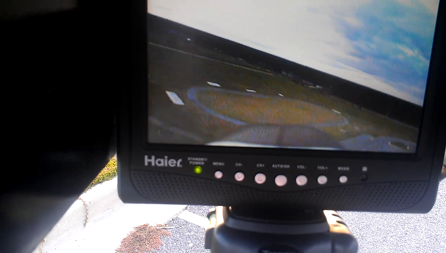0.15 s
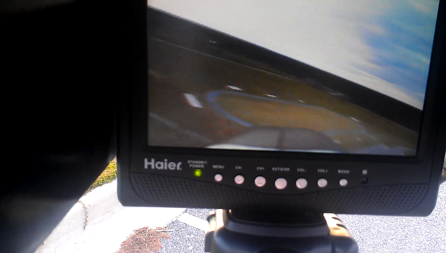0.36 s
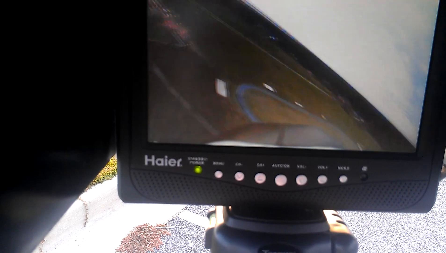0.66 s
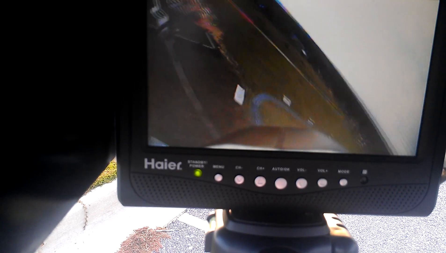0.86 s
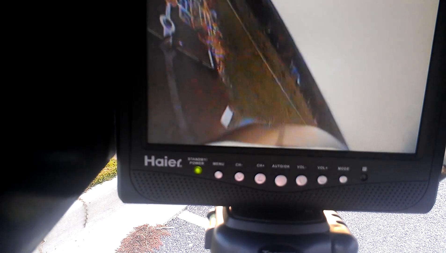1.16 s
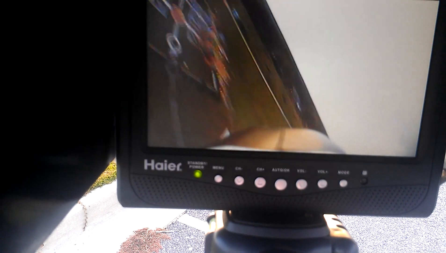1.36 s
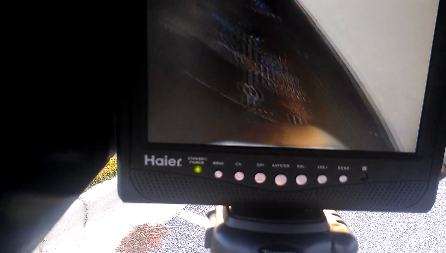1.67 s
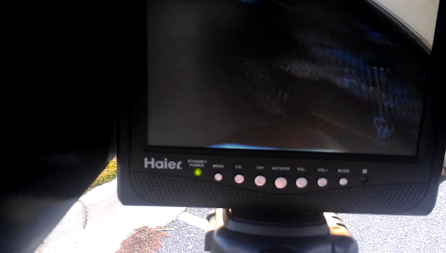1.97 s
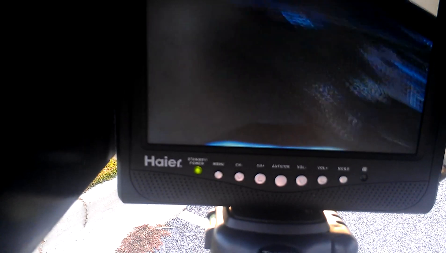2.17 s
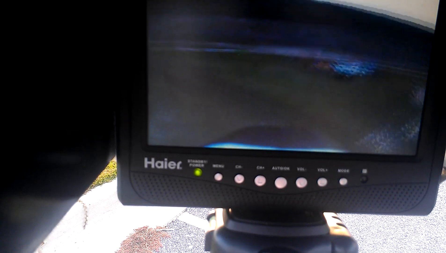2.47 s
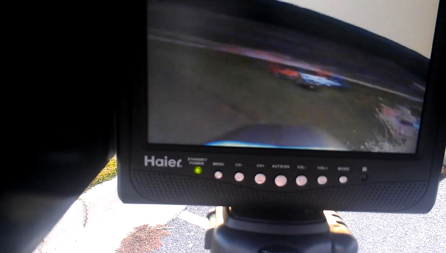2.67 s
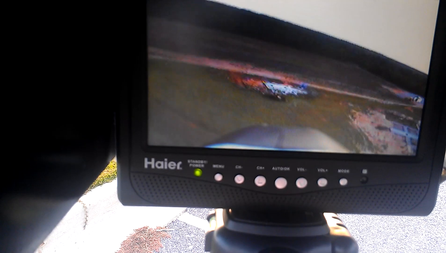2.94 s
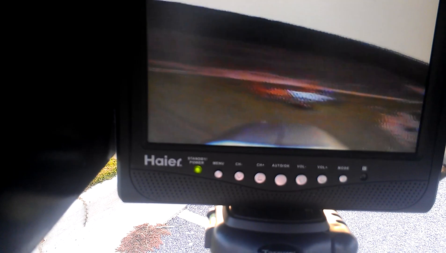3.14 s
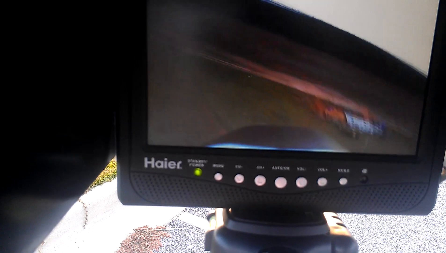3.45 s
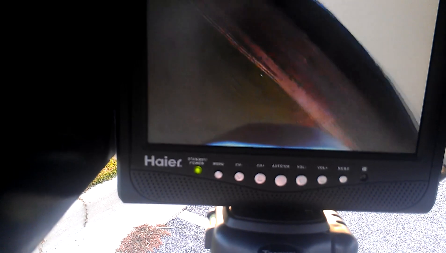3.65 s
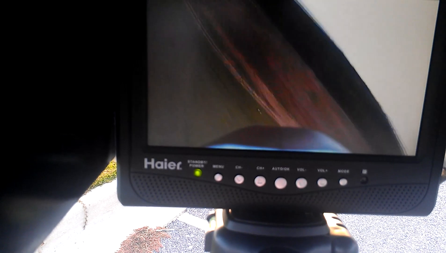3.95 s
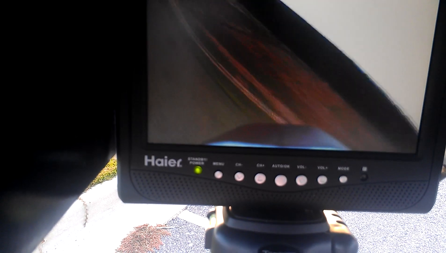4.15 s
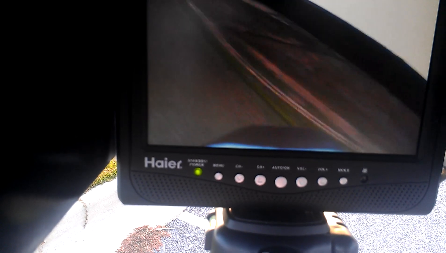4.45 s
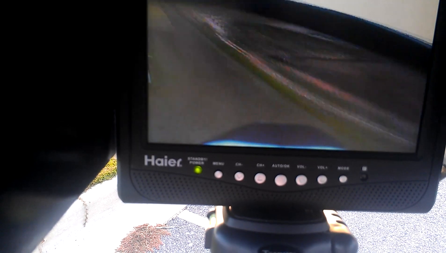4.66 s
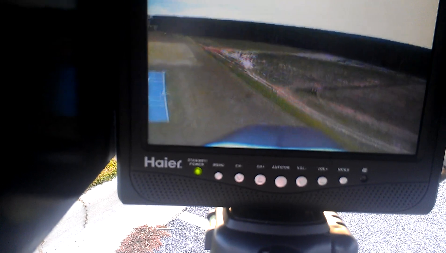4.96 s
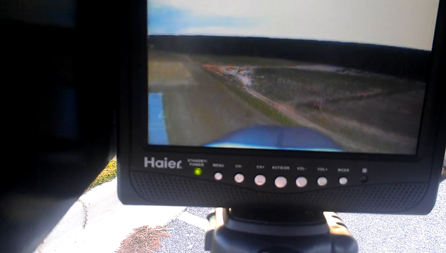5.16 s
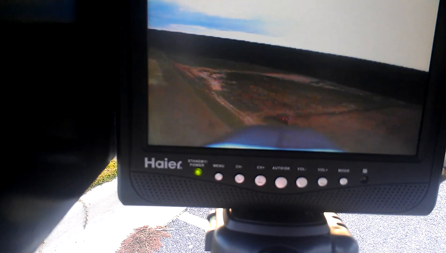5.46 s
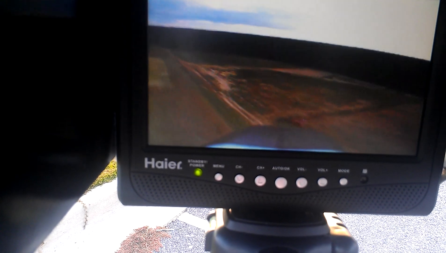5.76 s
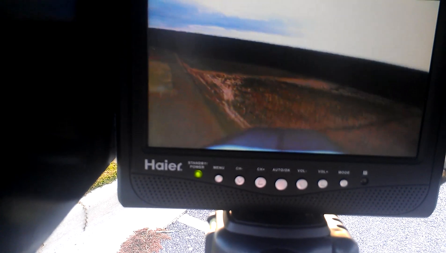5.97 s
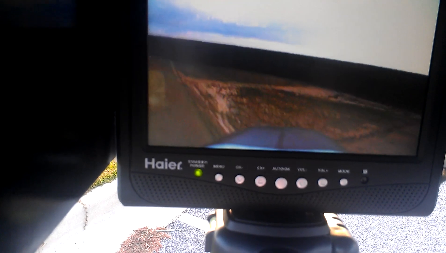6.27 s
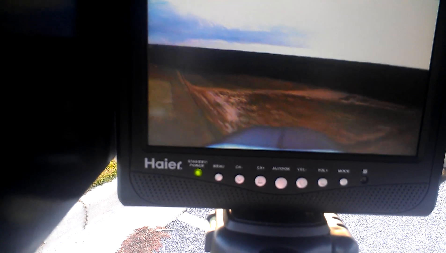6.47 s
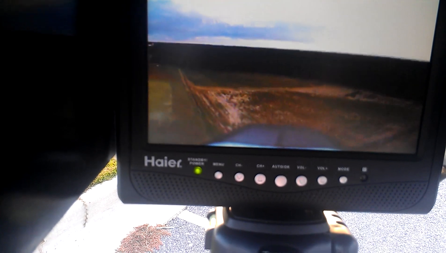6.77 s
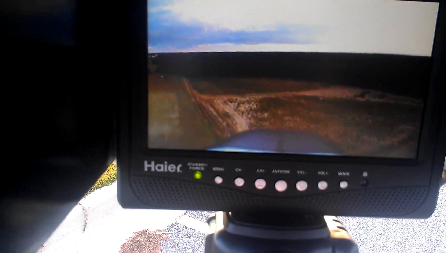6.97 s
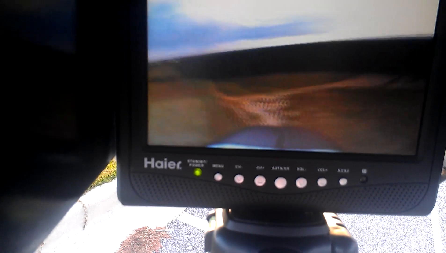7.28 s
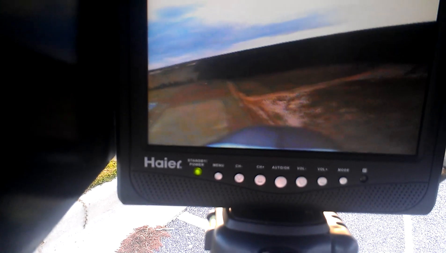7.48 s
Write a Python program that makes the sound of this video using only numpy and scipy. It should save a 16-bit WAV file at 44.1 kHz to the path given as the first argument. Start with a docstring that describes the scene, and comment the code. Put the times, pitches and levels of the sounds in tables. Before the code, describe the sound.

A thin, hissing propeller buzz drops away into broken wind gusts, a click and two small bumps, then climbs back to full power.

```python
"""A small electric model plane is heard through its own on-board microphone, by radio and a field monitor's
little speaker: propeller hiss, shaft-order tones, controller whine and wind, shaped by filters and gain curves.
The throttle closes, the propeller runs down, then spools up again; gusts overload the microphone and choke
the sound in short gaps. One short ringing burst comes from the plane at 1.33 s, and two bumps near the listener
later, all as decaying modes. Also heard are a close rustle of filtered noise, open-air noise, a faint sine hum
and the distant plane's delayed, Doppler-raised blade tone."""
import sys
import numpy as np
from scipy import signal
from scipy.fft import rfft, irfft, next_fast_len
from scipy.io import wavfile
from scipy.ndimage import map_coordinates

SR = 44100
rng = np.random.default_rng(int(sys.argv[2]) if len(sys.argv) > 2 else 0)


def transcribe(u):
    """Save the signal u as a 16-bit wav file named by the first command-line argument.

    u: samples, shape (n,) or (channels, n), limited to [-1, 1]; the rate is SR.
    q: integer samples, one column per channel.
    """
    v = np.clip(np.atleast_2d(u).T, -1, 1)
    q = np.round(v * 32767).astype(np.int16)
    wavfile.write(sys.argv[1], SR, q)


def nominal_scale(level):
    """Amplitude ratio for a level in decibels (scalar or array-like)."""
    x = np.asarray(level, float) / 20
    return 10 ** x


N = 336042
T = np.arange(N) / SR  # time of each sample, s

# mean rotation of the propeller shaft: time_s, shaft_turns_per_s
SHAFT_SPEED = [(0, 257.6), (.95, 257.5), (1.03, 223), (1.11, 187), (1.17, 163), (1.3, 128), (2.27, 110),
               (2.51, 143), (2.62, 163.3), (2.8, 172.3), (2.97, 179.5), (3.21, 205.7), (3.33, 212.1),
               (3.49, 218.5), (3.71, 221), (3.8, 237.2), (3.88, 257.7), (5.7, 257.7), (7.62, 257.2)]
# on-board sound before the speaker: time_s, relative_level_db, wind_over_hiss_db
FLIGHT_LEVELS = [(0, -16.5, -4), (.5, -17.5, -3), (.93, -18.5, -11.5), (1.1, -21.5, 4), (1.2, -26.5, 15.5),
                 (1.34, -27.5, 9), (1.56, -34.5, 21.5), (2.05, -32, 32), (2.24, -33.5, 19),
                 (2.3, -29.5, 10.5), (2.64, -23.5, 6.5), (2.85, -29, 6.5), (3.27, -20, 2), (3.73, -18, 0.5),
                 (3.89, -15, -6.5), (4.04, -21, -10), (4.33, -14.5, 3), (4.55, -17, 5.5),
                 (4.63, -12.5, -1.5), (4.82, -17, 1), (5.5, -16.5, 4.5), (5.9, -16, 1.5), (6.25, -17.5, 3),
                 (6.69, -16, -3), (7.15, -18.5, 4.5), (7.62, -15.5, -1)]
# gust overloads: centre_s, length_s, depth_db
GUST_CHOKES = [(.077, 0.034, 5), (.148, 0.023, 2.5), (.486, 0.014, 16), (.502, 0.0027, 26),
               (.534, .004, 15), (.608, 0.011, 12), (.86, 0.048, 5.5), (1.045, 0.024, 8),
               (1.146, 0.0057, 14), (1.285, 0.071, 10), (1.32, 0.019, 29), (1.376, 0.01, 28),
               (1.392, 0.014, 25), (1.41, 0.014, 27), (1.441, 0.047, 8), (1.475, 0.028, 15),
               (1.516, .018, 18), (1.551, 0.019, 24), (1.578, 0.025, 35), (1.631, 0.038, 15),
               (1.68, 0.037, 7), (1.711, 0.012, 28), (1.727, 0.0082, 20), (1.785, 0.018, 40),
               (1.804, 0.0096, 22), (1.912, 0.012, 15), (2.033, 0.0091, 10), (2.22, .05, 13),
               (2.254, 0.016, 23), (2.279, 0.0063, 13), (2.362, 0.031, 16), (2.442, 0.0091, 22),
               (2.485, 0.035, 30), (2.599, 0.045, 21), (2.898, 0.0061, 10), (2.918, 0.0092, 17),
               (2.943, 0.028, 17), (2.968, 0.0094, 22), (2.985, .004, 22), (3.003, 0.0093, 13),
               (3.57, 0.0087, 10), (3.587, 0.014, 18), (3.603, 0.0014, 25), (3.629, 0.0074, 17),
               (3.706, 0.024, 5.5), (4.149, 0.0083, 15), (4.27, 0.013, 17), (4.379, 0.046, 7),
               (4.412, 0.027, 12.5), (4.464, 0.064, 5.5), (4.567, 0.032, 10), (4.7, 0.13, 4.5),
               (5.458, 0.047, 5.5), (5.543, 0.0049, 31), (5.615, 0.022, 6), (5.685, 0.013, 13),
               (5.707, .007, 35), (5.723, 0.014, 28), (5.76, 0.0074, 19), (5.92, 0.03, 3.5),
               (6.153, 0.025, 6), (6.265, 0.018, 7), (6.328, 0.011, 12.5), (6.531, 0.061, 3.5),
               (6.631, 0.024, 10.5), (6.716, 0.052, 6), (6.862, 0.024, 5.5), (6.917, 0.015, 27),
               (6.934, 0.0078, 26), (6.975, 0.021, 12), (7.08, 0.029, 17), (7.102, 0.0063, 37),
               (7.161, .007, 15), (7.25, 0.0079, 15), (7.35, 0.045, 5.5), (7.378, 0.012, 19),
               (7.42, 0.055, 24.5), (7.46, 0.03, 10.5), (7.487, 0.0053, 25), (7.517, .005, 20)]
# shaft orders, even ones from the two blades, 42 from the commutation; levels before the common tone gain:
# multiple, full_speed_db, part_speed_db
SHAFT_ORDERS = [(2, -14, -11), (3, -18, -35), (4, -20.5, -8.5), (5, -19.5, -26), (6, -11, -9.5),
                (8, -8.5, -9.5), (10, -17.5, -14), (12, -16, -15), (14, -23.5, -30), (16, -19.5, -35),
                (18, -20, -39), (20, -21, -34), (22, -15, -18), (42, -16, -6)]
# wind on the on-board microphone, duller than the propeller hiss: frequency_hz, gain_db
WIND_SPECTRUM = [(200, 1.5), (550, 3), (850, 7.5), (1100, -2.5), (1500, -2), (2000, -7), (3000, -19),
                 (5000, -17.5), (8000, -47)]
# small speaker in its plastic case, from cone resonance to break-up; all three: frequency_hz, gain_db
CONE_RESPONSE = [(151, -69.5), (237, -61), (409, -39), (484, -29.5), (530, -23.5), (668, -22.5), (760, -17),
                 (800, -21.5), (851, -15), (1184, -19), (1540, -11.5), (1701, -13.5), (1900, -0.5),
                 (2090, -2.5)]
CASE_RESPONSE = [(2196, -15.5), (2455, -17.5), (2606, -10), (2900, -18), (3025, -24.5), (3316, -15.5),
                 (3600, -17.5), (4253, -13.5), (4587, -19), (4867, -6), (5157, -7.5), (5300, -16),
                 (5480, -10)]
BREAKUP_RESPONSE = [(5700, -2.5), (6008, -1.5), (6202, -6.5), (6600, -23.5), (7300, -26), (7752, -21),
                    (8086, -32.5), (8549, -22.5), (8900, -31), (9679, -41), (10800, -35), (11488, -40),
                    (12100, -40.5), (12450, -40)]
# one short ringing burst from the plane, then two bumps near the listener:
# start_s, ring_db, thud_over_ring_db, upper_modes_db
RINGING_EVENTS = [(1.3324, -19.5, -30, -6), (2.0412, -24, -7, -2), (2.1197, -25, -18, 1)]
# modes used for the burst and the bumps alike: frequency_hz, relative_level_db, t60_s
RINGING_MODES = [(4300, 7, 0.013), (2060, 4, 0.02), (6160, -6, 0.0074)]
# rustling cloth: frequency_hz, gain_db
CLOTH_SPECTRUM = [(1500, -21.0), (3000, 9.0), (4250, 21.0), (5200, 4), (7500, -7.0), (10000, -41.0)]
# mean level of the rustle: time_s, level_db
RUSTLE_LEVEL = [(1.88, -60), (2.03, -40), (2.17, -48), (2.3, -63)]
# mean level of the plane's blade tone through the open air: time_s, level_db
FAR_LEVEL = [(3.7, -75), (4.1, -64), (5, -55), (5.9, -47), (7.2, -51.5), (7.62, -42.5)]
# hum, mean pitch and level: pitch_hz, level_db
HUM_TONES = [(231.5, -70)]
# spectral shape of the open air: frequency_hz, gain_db
AIR_SPECTRUM = [(120, -45), (230, -13), (400, -6), (550, 2), (900, 5.5), (2000, -11.5), (6000, -14),
                (12000, -33), (13500, -59)]


def unit(x):
    """Normalization: divides a signal by its root-mean-square value."""
    return x / np.sqrt(np.mean(x ** 2) + 1e-20)


def curves(rows):
    """Linear interpolation: one value per sample for each column after the time."""
    s, *columns = np.transpose(rows)
    return [np.interp(T, s, column) for column in columns]


def wobble(rate):
    """Band-limited fluctuation: a smooth curve through random knots, rate of them a second."""
    knots = rng.standard_normal(int(N * rate / SR) + 4)
    return map_coordinates(knots, [T * rate])


def coloured(x, points):
    """Minimum-phase filtering: a folded cepstrum makes the (Hz, dB) response causal."""
    m = 2 * next_fast_len(N // 2 + 4096)
    hz, db = np.transpose(points)
    log_hz = np.log(np.fft.rfftfreq(m, 1 / SR) + 1)
    log_gain = np.log(nominal_scale(np.interp(log_hz, np.log(hz), db)))
    cepstrum = irfft(log_gain, m)
    causal = np.concatenate([cepstrum[:1], 2 * cepstrum[1:m // 2], np.zeros(m // 2)])
    return irfft(rfft(x, m) * np.exp(rfft(causal)), m)[:N]


def tone(hz):
    """Phase accumulation: a sine of rms 1 whose phase is the running sum of its pitch."""
    return np.sqrt(2) * np.sin(2 * np.pi * (np.cumsum(hz) / SR + rng.random()))


def propeller_hiss(turn):
    """Amplitude modulation: broadband blade noise swells at each passage of the two blades."""
    return rng.standard_normal(N) * (1 + 0.31 * tone(2 * turn))


def shaft_tones(shaft, turn, wind_db):
    """Harmonic radiation: periodic blade and commutation forces sound at multiples of the shaft rate."""
    full = np.clip((shaft - 222) / 35, 0, 1)  # blend from part speed to full speed
    tones = 0
    for multiple, full_db, part_db in SHAFT_ORDERS:
        order_db = part_db + full * (full_db - part_db) + wobble(20)
        tones = tones + nominal_scale(order_db) * tone(round(multiple) * turn)
    calm_db = -0.26 * np.clip(wind_db, -12, 5)  # tones gain as the wind drops
    slowing_db = 4 * np.log10(shaft / shaft.max())  # 4 dB lost for each tenfold slowing
    onset = np.clip((shaft - 148) / 25, 0, 1)  # no tone below 148 turns per second
    return onset * nominal_scale(-3.5 + calm_db + slowing_db) * tones


def controller_whine(shaft):
    """Switching noise: a fixed-pitch whine, randomly modulated, dies away near full power."""
    off_s, on_s = 1.3, 2.262  # the controller is off between these moments
    closing_s, opening_s = 0.29, 0.01  # fade ending at off_s, rise starting at on_s
    driven = np.clip(np.maximum((off_s - T) / closing_s, (T - on_s) / opening_s), 0, 1)
    low_db, full_db = -14, -49  # at low and at full throttle, before the on-board gain
    switching_db = low_db + (full_db - low_db) * (shaft / shaft.max()) ** 9.7
    whine = tone(np.full(N, 7817.5)) * (1 + 0.81 * wobble(900))
    return driven * whine * nominal_scale(switching_db)


def microphone_wind(wind_db):
    """Flow noise: filtered noise whose level follows the gusts."""
    return nominal_scale(wind_db + 0.81 * wobble(45)) * coloured(rng.standard_normal(N), WIND_SPECTRUM)


def overload_gain():
    """Saturation: pressure swings reduce the amplifier's slope, giving gaps and fast flutter."""
    count, typical_s, mean_db = 70, 0.01, 3.5  # lesser overloads at random moments
    draw = rng.random((count, 3))
    lengths = typical_s * nominal_scale(16 * (draw[:, 1] - 0.5))
    small = np.transpose([draw[:, 0] * N / SR, lengths, 2 * mean_db * draw[:, 2]])
    coarse = T[::8]
    gap_db = np.zeros(len(coarse))
    for centre_s, length_s, depth_db in [*GUST_CHOKES, *small]:
        power = 2 * round(1 + depth_db / 14)  # deeper gaps shut and open more abruptly
        gap_db += max(depth_db, 0) * np.exp(-(2 * (coarse - centre_s) / length_s) ** power)
    gap_db = np.interp(T, coarse, gap_db)
    # rapid pressure swings push the amplifier onto the flat ends of its curve
    buffet = 0.055 * wobble(30) + 0.5 * wobble(120) + 0.35 * wobble(280)
    flutter = unit(1 / np.cosh(buffet) ** 2)
    return nominal_scale(-gap_db) * flutter + nominal_scale(-26)  # never quite shut


def plane():
    """Linear superposition: hiss, wind and tones pass the speaker response; whine is added after it."""
    shaft, = curves(SHAFT_SPEED)
    level_db, wind_db = curves(FLIGHT_LEVELS)
    turn = shaft * (1 + 0.0005 * wobble(25))
    sources = propeller_hiss(turn) + microphone_wind(wind_db) + shaft_tones(shaft, turn, wind_db)
    gain = overload_gain() * nominal_scale(level_db + 0.6 * wobble(7.6))
    # the level curve counts propeller and wind together
    share = 1 / np.sqrt(1 + 0.087 * nominal_scale(2 * wind_db))
    speaker = CONE_RESPONSE + CASE_RESPONSE + BREAKUP_RESPONSE + [(14000, -120)]
    return nominal_scale(8.5) * coloured(gain * share * sources, speaker) + gain * controller_whine(shaft)


def burst_and_bumps():
    """Modal decay: the plane's burst and the two near bumps are exponentially decaying sines."""
    out = np.zeros(N)
    t = np.arange(SR // 10) / SR
    for start_s, ring_db, thud_db, upper_db in RINGING_EVENTS:
        ringing = nominal_scale(thud_db - 60 * t / 0.019) * np.sin(2 * np.pi * 380 * t)  # low thud
        for hz, mode_db, t60 in RINGING_MODES:
            decay_db = mode_db + upper_db * (hz > 3000) - 60 * t / t60
            ringing = ringing + nominal_scale(decay_db) * np.sin(2 * np.pi * hz * t)
        attack = 1 - np.exp(-t / 0.0016)
        out[round(start_s * SR):][:len(t)] += nominal_scale(ring_db) * ringing * attack
    return out


def rustle():
    """Friction noise: a short bright rustle close by, as noise under a fluctuating envelope."""
    cloth = unit(coloured(rng.standard_normal(N), CLOTH_SPECTRUM))
    return nominal_scale(curves(RUSTLE_LEVEL)[0] + 2.3 * wobble(120)) * cloth


def distant_plane():
    """Retarded time and Doppler shift: the blade tone arrives late, raised by the approach."""
    # sound sent half a second ago; the approach slows, so the raised pitch sinks a little
    since = T - 4.1
    sent = T - 0.556 + 0.029 * since - 0.0008 * since ** 2
    doppler = np.gradient(sent) * SR
    blades = 2 * np.interp(sent, *np.transpose(SHAFT_SPEED)) * doppler
    return nominal_scale(curves(FAR_LEVEL)[0] + 3.0 * wobble(7.1)) * tone(blades)


def hum():
    """Near-periodic oscillation: a faint sine drifts slightly in pitch and level."""
    return sum(nominal_scale(db + wobble(2.75)) * tone(hz + wobble(5.4)) for hz, db in HUM_TONES)


def open_air():
    """Stationary noise filtering: a shaped random floor drifts slowly in level."""
    return nominal_scale(-48.0 + 2.5 * wobble(2.15)) * unit(coloured(rng.standard_normal(N), AIR_SPECTRUM))


def scene():
    """Superposition: the pressures of all sources add at the listener's microphone."""
    background = distant_plane() + hum() + open_air()
    return (plane() + burst_and_bumps() + rustle() + background)[None]


def low_pass(x):
    """Removes everything above the highest recorded frequency."""
    return signal.sosfilt(signal.butter(12, 12410, fs=SR, output="sos"), x)


def record(dry):
    """Signal chain: the summed pressure passes through one last processing stage."""
    return low_pass(dry)


dry = scene()
out = record(dry)
transcribe(out)
```